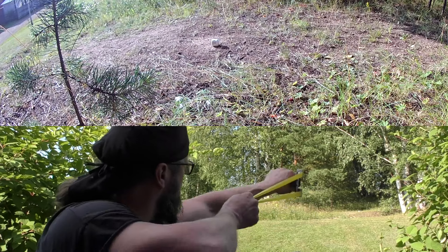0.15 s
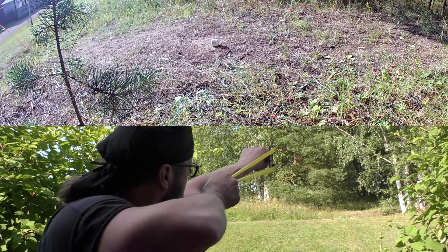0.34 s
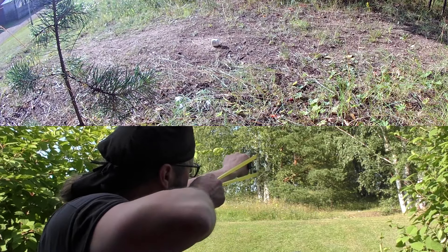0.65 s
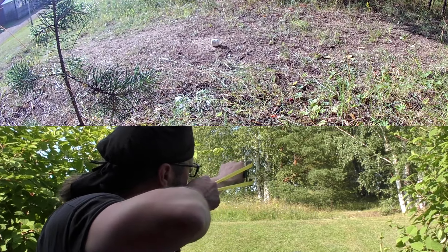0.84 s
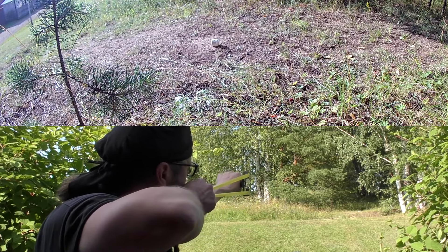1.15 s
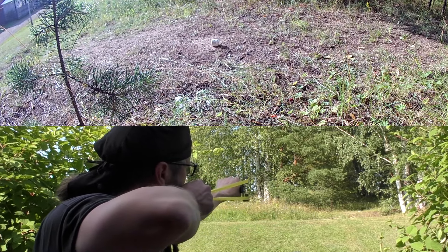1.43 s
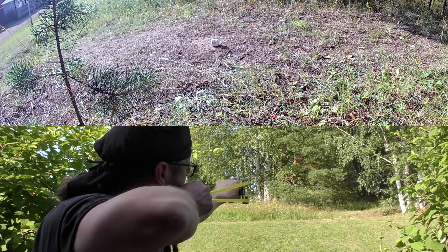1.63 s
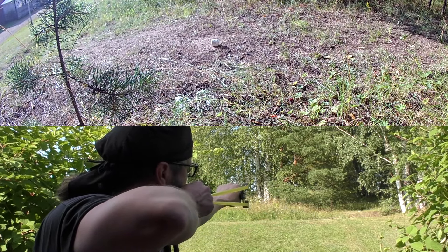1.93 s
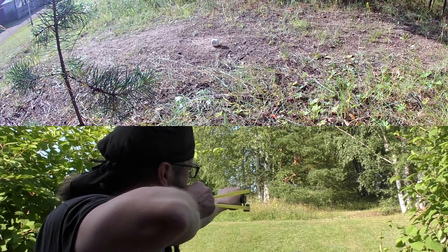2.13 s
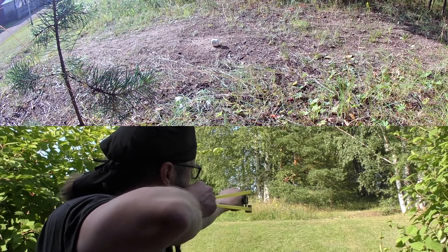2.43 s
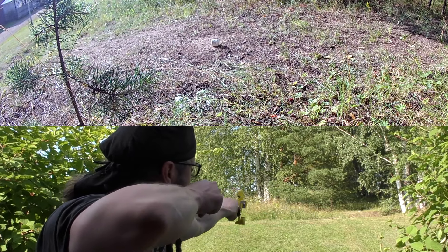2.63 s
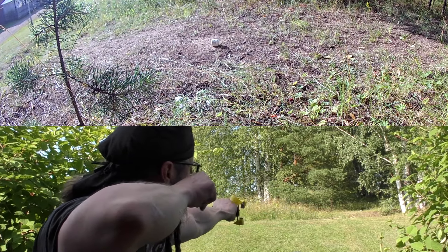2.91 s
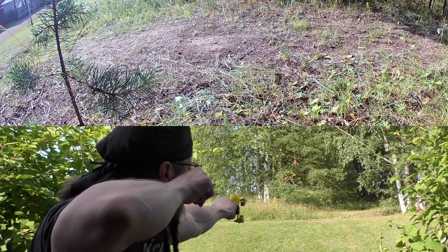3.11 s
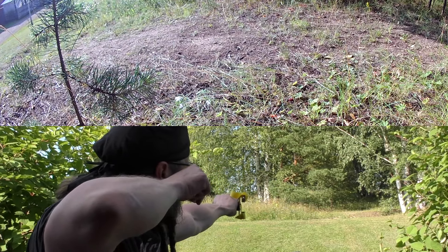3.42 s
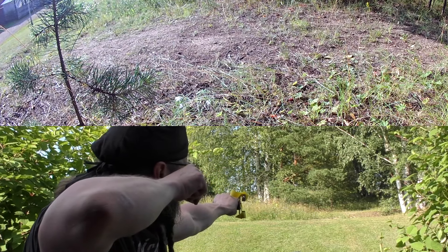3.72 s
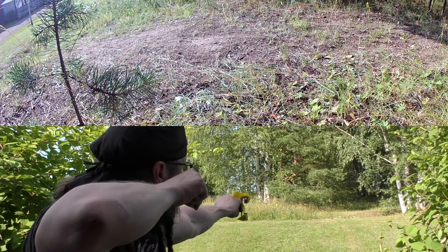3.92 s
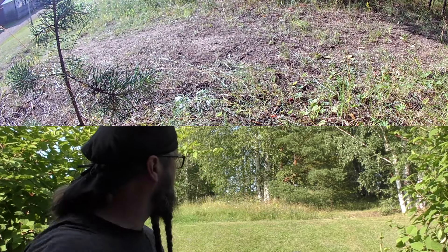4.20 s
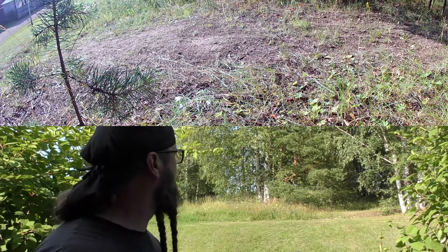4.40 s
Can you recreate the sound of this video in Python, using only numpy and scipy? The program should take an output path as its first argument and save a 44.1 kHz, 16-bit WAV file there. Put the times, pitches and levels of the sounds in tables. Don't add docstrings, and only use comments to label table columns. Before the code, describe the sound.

A close stereo pickup of a slingshot shot outdoors: barely audible creaking and cloth rustle, a long quiet wait with soft air and hiss, then a sharp rubbery crack and very brief flap. Less than half a second later come two loud hollow knocks about a fifth of a second apart, heard close at the target, clipped and scattered by trees, then small debris ticks and quiet.

```python
import sys
import numpy as np
from scipy import signal
from scipy.fft import rfft, irfft
from scipy.io import wavfile
from scipy.ndimage import uniform_filter1d

SR = 44100
rng = np.random.default_rng(int(sys.argv[2]) if len(sys.argv) > 2 else 0)


def to_linear_factor(level_db):
    exponent = np.asarray(level_db, float) / 20
    return 10 ** exponent


def generate_wav(sig):
    pcm = np.round(np.clip(np.atleast_2d(sig).T, -1, 1) * 32767).astype(np.int16)
    wavfile.write(sys.argv[1], SR, pcm)


N = 200822

# middle in seconds, level in dB, centre in Hz,
# half length in ms.
SLAPS = [(2.545, -22, 9000, .25), (2.5453, -28, 1500, .6), (2.5555, -4.5, 10500, 0.67),
         (2.556, -7.5, 14500, 0.41), (2.563, -11, 2200, 0.28), (2.565, -11.5, 8000, 0.95),
         (2.5687, -12.5, 11000, 0.66), (2.5754, -12, 10900, .6), (2.5773, -6.5, 3900, .9),
         (2.579, -8, 1800, .55), (2.58, -4.5, 4760, .45), (2.593, -15.5, 3500, .6)]
# pitch in Hz, level in dB per Hz.
TAUT_COLOUR = [(240, -43), (400, -17), (1090, -10.5), (1820, -7), (2250, -10.5), (3810, -1), (4380, -9.5),
               (4730, -7), (6740, -4.5), (10700, -4.5), (16000, -12)]
# pitch in Hz, level in dB per Hz.
SLACK_COLOUR = [(1060, -39.5), (1800, -9), (2480, -9), (3610, -2.5), (4700, -5.5), (7490, -5), (10400, -8),
                (16000, -24)]
# pitch in Hz, width in Hz, level in dB.
GUST_TONES = [(70, 50, -11), (138, 73, 0), (333, 100, -0.5), (480, 150, -5.5), (1250, 500, -1)]
# start in seconds, blow in dB, rise of the body in seconds, crack in dB.
KNOCKS = [
    (2.9461, 8, .002, -1),
    (3.15912, 20, .0002, -40),
]
# pitch in Hz, width in Hz, level in dB.
CRACK_TONES = [(4600, 3500, 1.5), (10500, 5300, -3.5), (14330, 2500, -12.5)]
# pitch in Hz, level in dB,
# time to fall 60 dB in seconds.
BODIES = [
    [(1300, 4.5, 0.0057), (995, -10.5, 0.02), (2200, -7, 0.024), (141.6, -21.5, 0.013), (3160, -11, 0.0097)],
    [(1080, 3.5, .025), (736.3, -4.5, 0.038), (2287, -8.5, .035), (1300, -15, 0.015), (3110, -18.5, 0.018),
     (4620, -24, 0.016), (632, -7, 0.023)],
]
# delay in seconds, level in dB, rise in seconds,
# time to fall 60 dB in seconds.
BANKS = [
    [(.003, 6.5, 0.0021, 0.07), (.02, 4, 0.019, 0.15), (.06, -17, .03, 0.75)],
    [(.002, 6, 0.00061, 0.034), (.0105, -1, 0.0032, 0.08), (.03, -5, .004, .1), (.05, -23.5, 0.017, 0.86),
     (.155, -37, 0.012, 0.24)],
]
# pitch in Hz, level in dB per Hz.
ECHO_COLOURS = [
    [(180, -65), (300, -32.5), (828, -25.5), (1210, 0), (1430, -5.5), (1560, -4.5), (2030, -14.5),
     (2210, -9.5), (2700, -13), (2980, -12), (4990, -10.5), (5900, -24), (9710, -28), (16000, -44)],
    [(300, -31.5), (600, -23.5), (800, -4.5), (1150, 3), (1700, -9), (2340, -11), (3000, -24),
     (3500, -22.5), (4750, -17.5), (5800, -34), (6900, -31), (8000, -45), (12000, -52.5), (16000, -75)],
]
# level in dB, dulling in dB per second and kHz, stereo width in dB.
ECHOES = [
    (-16.5, 3, -4.5),
    (-16.5, 2, -40),
]
# delay in seconds, drop in dB, left-right lean in dB,
# top pitch in Hz.
LIMITS = [
    (.0018, 7, -1.46, 14900),
    (.0026, 25.5, 0, 5260),
]
# middle in seconds, level in dB, half
# length in seconds.
RATTLES = [
    (.0, -60, 0.023),
    (0.084, -53.5, 0.021),
    (0.189, -52, 0.024),
    (.3, -54, 0.036),
    (0.403, -62, 0.029),
    (.49, -69, 0.038),
]
# pitch in Hz, width in Hz, level in dB.
RATTLE_TONES = [(2040, 1050, 0), (2550, 82, -2), (4020, 1100, -7.5), (5730, 400, -15), (7160, 400, -15),
                (7640, 120, -18)]
# pitch in Hz, width in Hz, level in dB.
SLEEVE_TONES = [(1770, 1200, 8.5), (2250, 280, -6), (4500, 2100, -4.5)]
# start in seconds, level in dB, centre in Hz,
# width in Hz.
TICKS = [(2.883, -59.5, 5220, 1217), (2.904, -51.5, 5360, 1800), (2.912, -61, 4600, 399),
         (2.9436, -72, 9850, 5950), (2.9506, -40, 9000, 7100), (3.241, -61, 4600, 1500),
         (3.266, -61, 4500, 1000), (3.2844, -41.5, 697, 553), (3.2846, -55, 232, 150),
         (3.286, -55, 2200, 697), (3.315, -61, 4820, 1210), (3.317, -44.5, 1080, 401.6),
         (3.351, -61, 4500, 1510)]
# pitch in Hz, width in Hz, level in dB.
DRONE_TONES = [(915, 130, -7), (1115, 190, 1), (1510, 170, -7)]
# middle in seconds, level in dB,
# half length in seconds.
DRONE_SWELLS = [
    (1.05, -60, 0.35),
    (2.292, -51, 0.097),
    (2.52, -51.5, 0.16),
    (2.75, -57.5, 0.17),
    (3.11, -42, 0.051),
    (3.5, -52, 0.23),
    (4.1, -53.5, 0.36),
]
# pitch in Hz, level in dB per Hz.
AIR_COLOUR = [(15, -36.5), (25, -9.5), (84, 0.5), (195, -3), (223, -5), (263, -4), (503, -9), (714, -11),
              (1100, -8.5), (1480, -13), (1610, -13.5), (2160, -20), (7710, -36.5), (14800, -31),
              (16000, -40.5)]
# pitch in Hz, left-right difference against the middle in dB.
AIR_WIDTH = [(60, -20.5), (110, -17.5), (200, -13), (380, -16.5), (700, -27.5), (1290, -11.5), (2380, -8),
             (4400, -9), (8120, -12), (15000, -7.5)]
# pitch in Hz, gain of the left-right difference in dB.
PORTS = [(5000, 0), (6200, -7), (7000, -21), (8200, -14.5), (9500, 0.5)]

LET_GO_S, SNAP_S, SLACK_S = 2.5445, 2.554, 2.584
FLAP_RISE_S, FLAP_FALL_DB_PER_S = 0.001, 385.5


def bands():
    out = np.zeros((2, N))
    t = np.arange(-300, 300) / SR
    for middle_s, db, hz, half_ms in SLAPS:
        width_hz = 30 * np.sqrt(hz)
        shape = np.exp(-(t * 1000 / half_ms) ** 2)
        slap = tones(pair(len(t), width_db=-19.0), [(hz, width_hz, 0)]) * shape
        add(out, middle_s + t[0], to_linear_factor(db + 6) * slap / abs(slap).max())

    t = LET_GO_S + np.arange(SR // 2) / SR
    late = np.clip((t - SLACK_S - 0.01) / 0.06, 0, 1)
    bumps = evened(uniform_filter1d(rng.standard_normal(len(t)), 30))
    noise = pair(len(t), width_db=-9.0 + 5.5 * late) * to_linear_factor((2.5 - 0.99 * late) * bumps)
    taut = evened(coloured(noise, TAUT_COLOUR))
    slack = evened(coloured(noise, SLACK_COLOUR))
    flutter = (1 - late) * taut + late * slack
    rush = burst(t, LET_GO_S, SNAP_S, db=-31, rise=0.003, fall_db_per_s=FLAP_FALL_DB_PER_S)
    flap = burst(t, SNAP_S, SLACK_S, db=-10.5, rise=FLAP_RISE_S, fall_db_per_s=FLAP_FALL_DB_PER_S)
    leaves = burst(t, SNAP_S, SLACK_S, db=-35.5, rise=FLAP_RISE_S, fall_db_per_s=106.5)
    gust = burst(t, SNAP_S, SLACK_S, db=-22, rise=0.0012, fall_db_per_s=480)
    buffeting = gust * tones(pair(len(t), width_db=0.1), GUST_TONES)
    add(out, LET_GO_S, flutter * (rush + flap + leaves) + buffeting)
    return out


def knock(blow_db, body_rise_s, crack_db, echo_db, dulling, width_db, limit, body, banks, colour):
    t = np.arange(SR // 2) / SR
    crack = tones(rng.standard_normal(len(t)), CRACK_TONES) * to_linear_factor(crack_db - 60 * t / 0.003)
    hollow = 0
    for k, (hz, db, t60) in enumerate(body):
        hollow = hollow + (-1) ** k * to_linear_factor(db) * ring(hz, t60, len(t))
    hollow = (1 - np.exp(-t / body_rise_s)) * hollow

    after_s, drop_db, lean_db, top_hz = limit
    limiter = to_linear_factor(-drop_db * np.clip((t - after_s) / 0.00013, 0, 1))
    overload = np.clip(crack + to_linear_factor(blow_db) * hollow * limiter, -1, 1)
    rounded = signal.lfilter(*signal.butter(2, min(top_hz, 18000), fs=SR), overload)
    direct = np.outer(to_linear_factor([lean_db, -lean_db]), rounded)

    clumps = 0
    for delay, db, rise, t60 in banks:
        since = np.maximum(t - delay, 0)
        clumps = clumps + to_linear_factor(db - 60 * since / t60) * (1 - np.exp(-since / rise))
    hz, at, z = signal.stft(evened(coloured(pair(len(t), width_db), colour)), SR, nperseg=256)
    dulled = z * to_linear_factor(-dulling * np.outer(hz / 1000, at))
    echoes = signal.istft(dulled, SR, nperseg=256)[1][:, :len(t)]
    return direct + to_linear_factor(echo_db) * clumps * echoes


def rattles():
    t = np.arange(SR) / SR
    shot = tones(pair(SR, width_db=-7), RATTLE_TONES) * swells(t, RATTLES)
    sleeve_fade = to_linear_factor(-58) * np.exp(-(t / 0.63) ** 2)
    sleeve = sleeve_fade * tones(pair(SR, width_db=-11), SLEEVE_TONES)
    return np.pad(shot + sleeve, ((0, 0), (0, N - SR)))


def ticks():
    out = np.zeros(N)
    t = np.arange(2000) / SR
    for start_s, db, hz, width in TICKS:
        shape = np.exp(-t * width / 3.5) * (1 - np.exp(-t * width * 3))
        puff = tones(rng.standard_normal(len(t)), [(hz, width, 0)]) * shape
        add(out, start_s, to_linear_factor(db + 11.5) * puff / abs(puff).max())
    return out


def drone():
    return tones(pair(N, width_db=-11), DRONE_TONES) * swells(np.arange(N) / SR, DRONE_SWELLS)


def air():
    frames, hz = N // 256 + 5, np.fft.rfftfreq(1024, 1 / SR)
    a, b, c, d, patches = rng.standard_normal((frames, 513, 5)).T
    patches = uniform_filter1d(patches, 12, 0)
    patches = evened(uniform_filter1d(patches, 14, 1))
    mid = a + 1j * b
    side = to_linear_factor(read(AIR_WIDTH, hz) + 1.5)[:, None] * (c + 1j * d)
    level = to_linear_factor(read(AIR_COLOUR, hz)[:, None] + 0.61 * patches)
    z = np.array([mid + side, mid - side]) * level
    x = signal.istft(z, nperseg=1024, noverlap=768)[1][:, :N]
    return to_linear_factor(-51.5 + 1.31) * x / np.std(x.mean(0))


def tones(noise, table):
    total = 0
    for hz, width, db in table:
        once = resonate(noise, hz, width)
        total = total + to_linear_factor(db) * evened(resonate(once, hz, width))
    return evened(total)


def resonate(x, hz, width):
    turn = np.exp(2j * np.pi * hz * np.arange(x.shape[-1]) / SR)
    r = np.exp(-np.pi * width / SR)
    return 2 * (turn * signal.lfilter([1 - r], [1, -r], x / turn)).real


def ring(hz, t60, size):
    t = np.arange(size) / SR
    return to_linear_factor(-60 * t / t60) * np.cos(2 * np.pi * hz * t)


def swells(t, table):
    return sum(to_linear_factor(db) * np.exp(-((t - middle) / half) ** 2) for middle, db, half in table)


def burst(t, start, end, db, rise, fall_db_per_s):
    attack = 1 - np.exp(-np.maximum(t - start, 0) / rise)
    return attack * to_linear_factor(db - fall_db_per_s * np.maximum(t - end, 0))


def pair(size, width_db):
    mid, side = rng.standard_normal((2, size))
    return mid + np.outer([1, -1], to_linear_factor(width_db) * side)


def coloured(x, points):
    size = x.shape[-1]
    gain = to_linear_factor(read(points, np.fft.rfftfreq(size, 1 / SR)))
    return irfft(rfft(x) * gain, size)


def read(points, hz):
    f, value = np.transpose(points)
    return np.interp(np.log(hz + 1), np.log(f + 1), value)


def evened(x):
    return x / np.sqrt(np.mean(x ** 2) + 1e-20)


def add(mix, s, sound):
    part = mix[..., round(s * SR):][..., :sound.shape[-1]]
    part += sound[..., :part.shape[-1]]


def scene():
    out = bands() + rattles() + ticks() + drone() + air()
    for (start_s, *strength), echo, *parts in zip(KNOCKS, ECHOES, LIMITS, BODIES, BANKS, ECHO_COLOURS):
        add(out, start_s, knock(*strength, *echo, *parts))
    return out


def low_pass(x):
    return signal.sosfilt(signal.butter(12, 16500, fs=SR, output="sos"), x)


def record(dry):
    mid = dry.mean(0)
    side = coloured((dry[0] - dry[1]) / 2, PORTS)
    top_cut = signal.firwin(1023, 15720, window=("kaiser", 8), fs=SR)
    cut = signal.oaconvolve(np.array([mid + side, mid - side]), top_cut[None], "same")
    return low_pass(np.clip(cut, -1, 1))


dry = scene()
out = record(dry)
generate_wav(out)
```